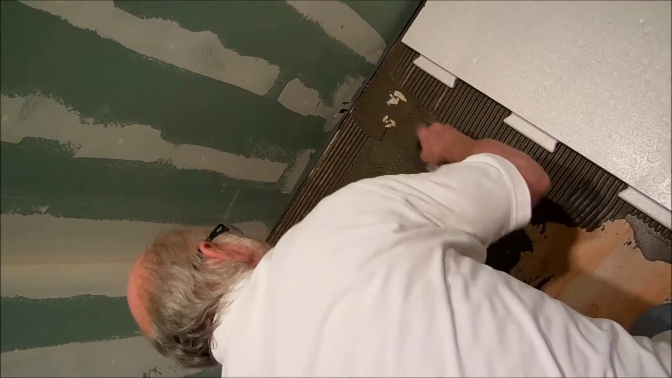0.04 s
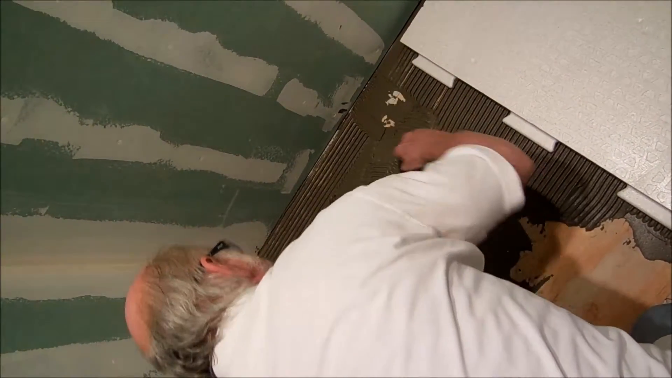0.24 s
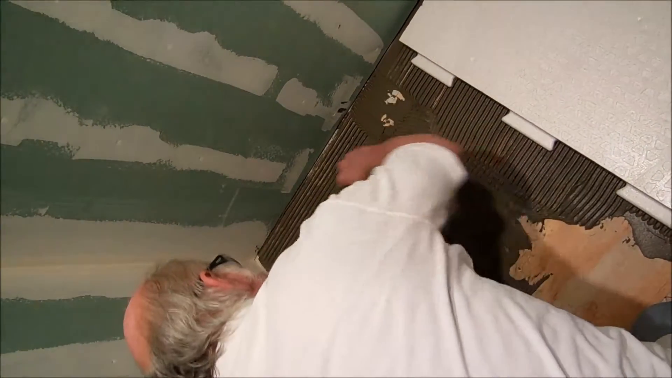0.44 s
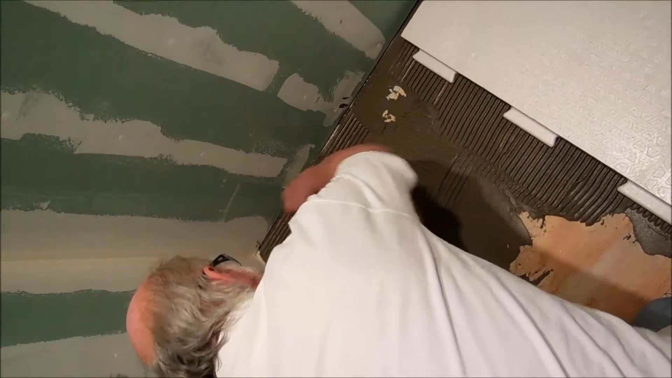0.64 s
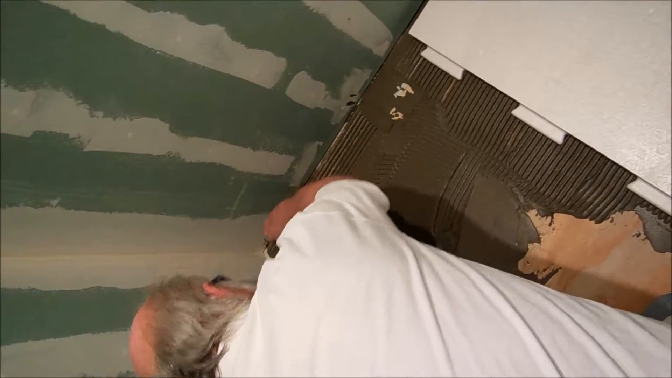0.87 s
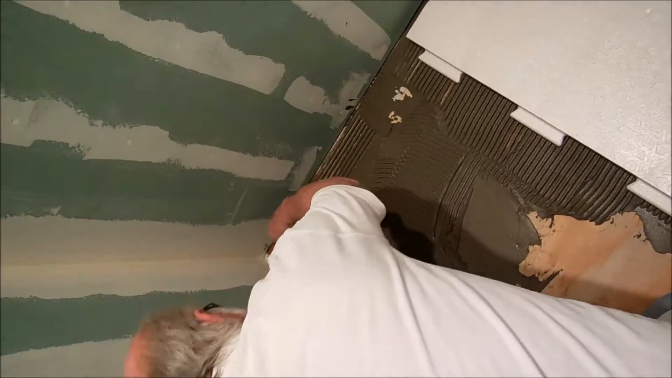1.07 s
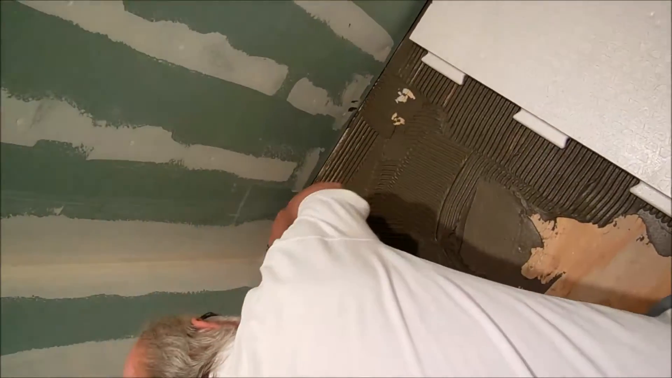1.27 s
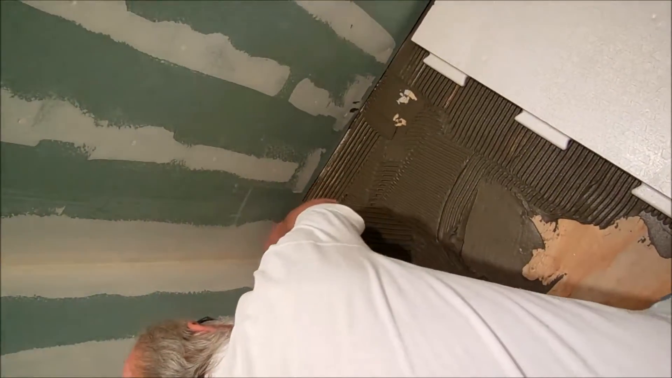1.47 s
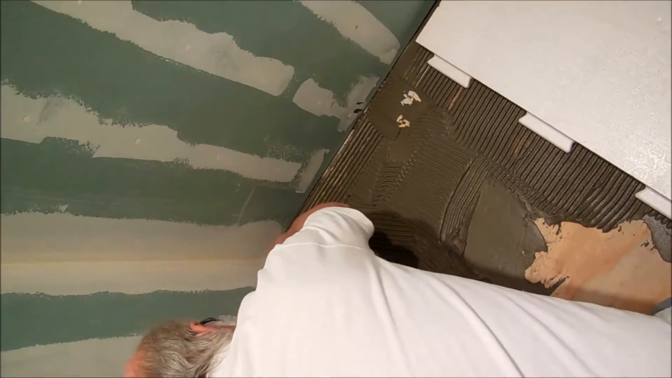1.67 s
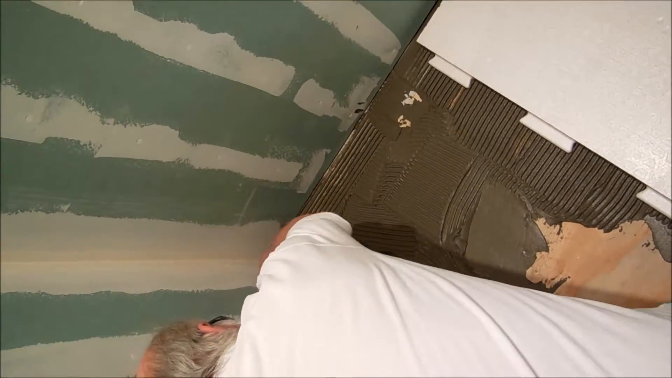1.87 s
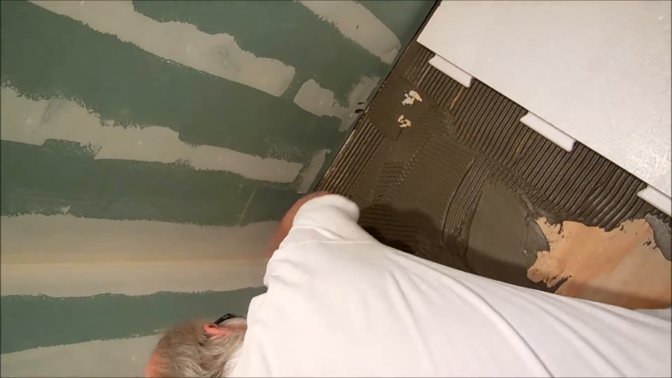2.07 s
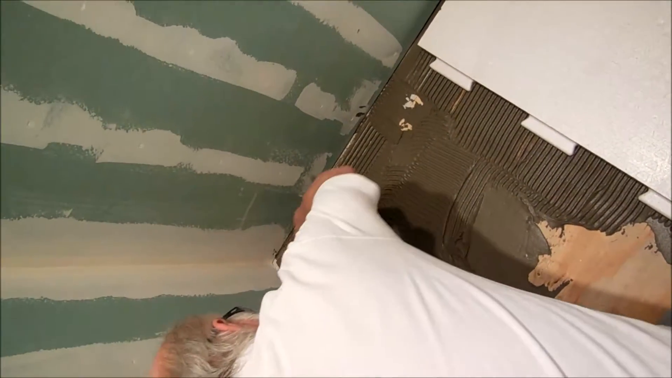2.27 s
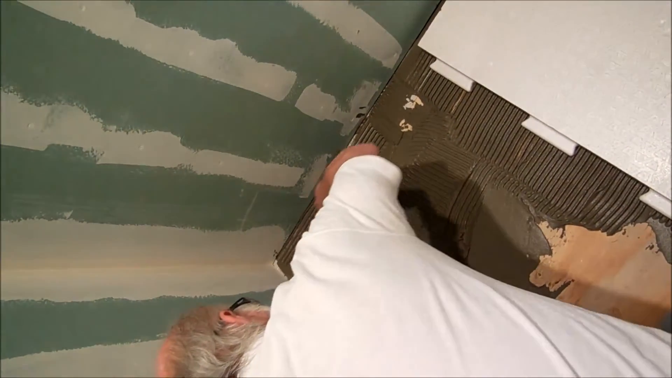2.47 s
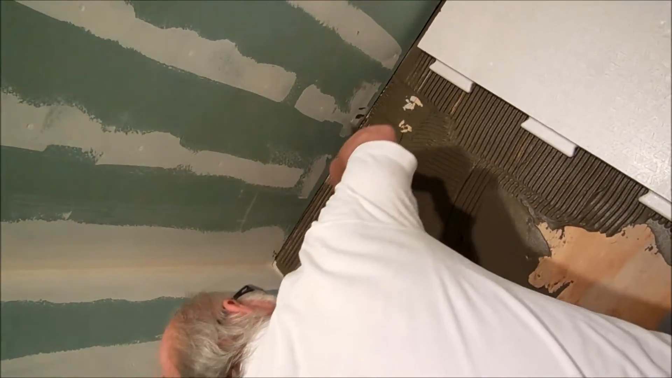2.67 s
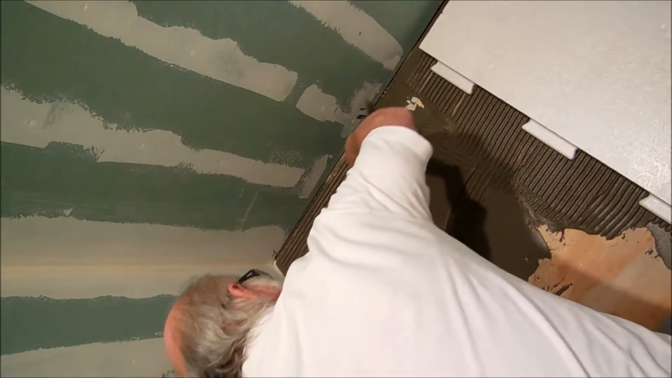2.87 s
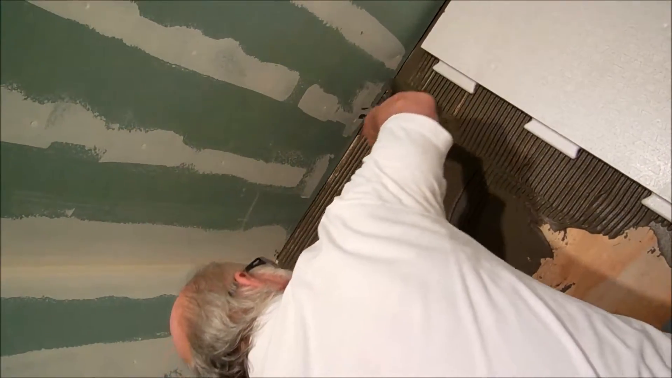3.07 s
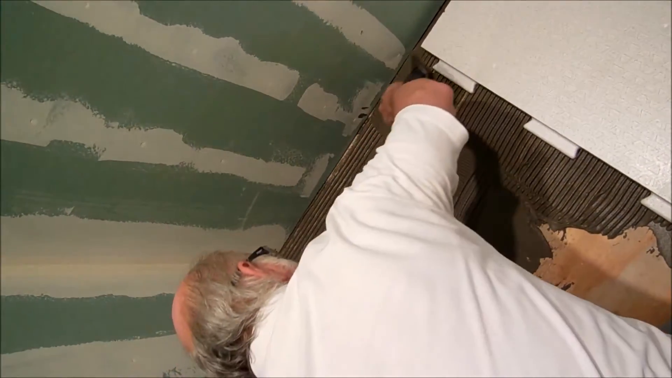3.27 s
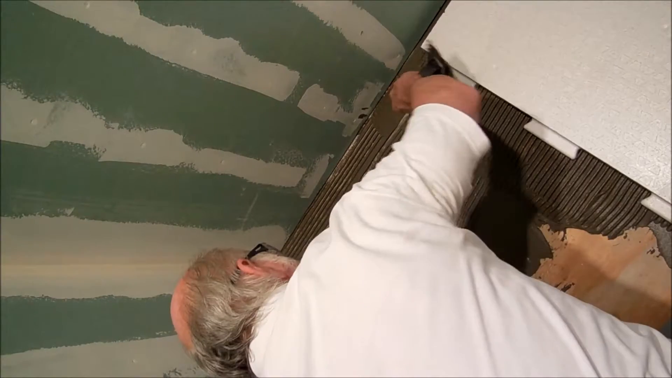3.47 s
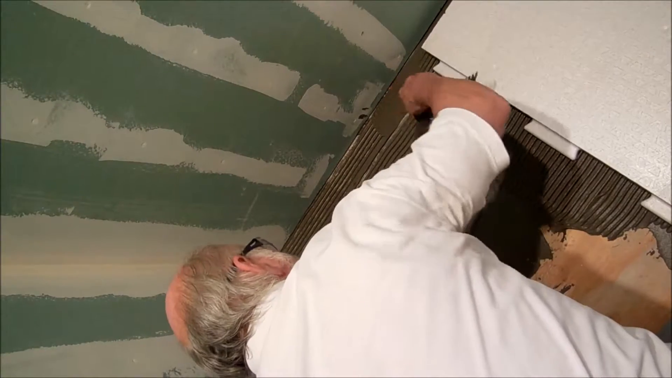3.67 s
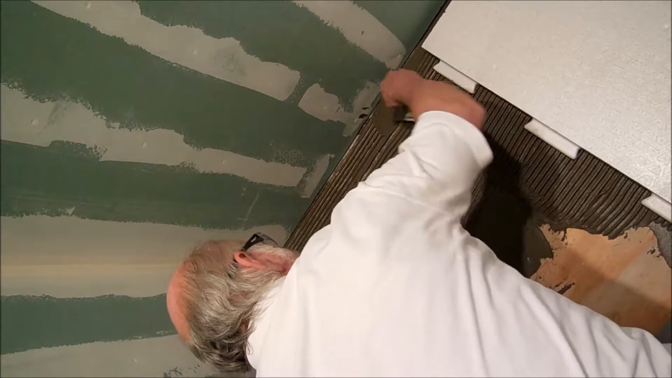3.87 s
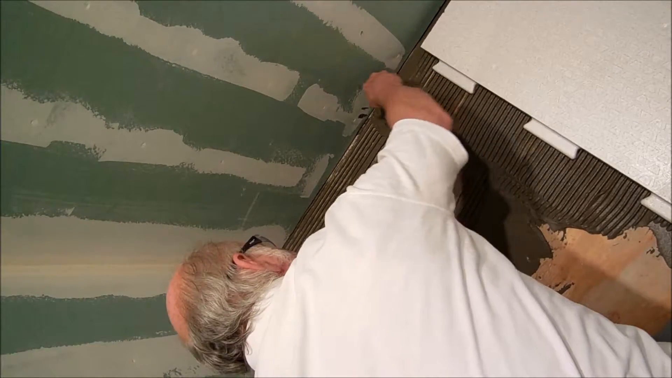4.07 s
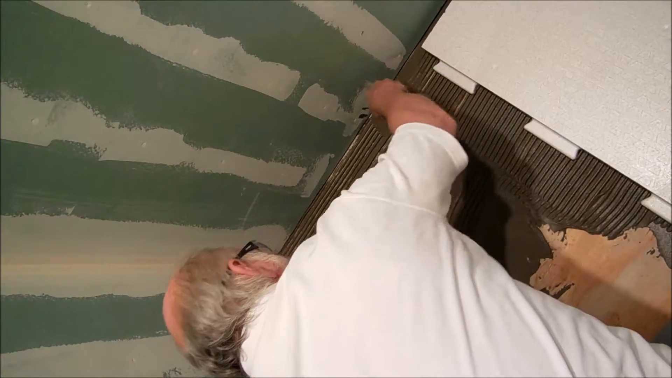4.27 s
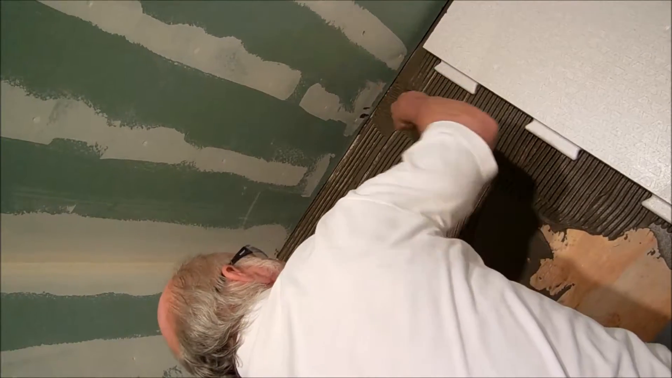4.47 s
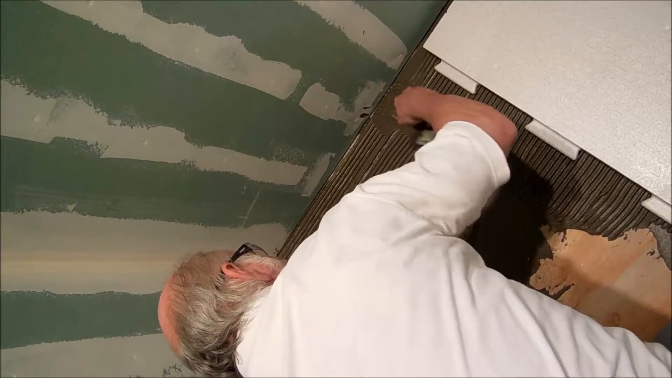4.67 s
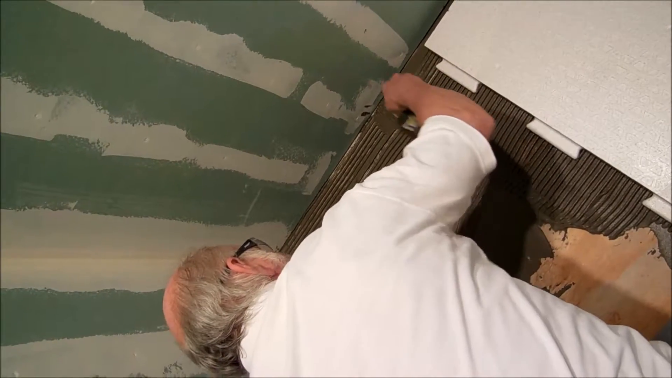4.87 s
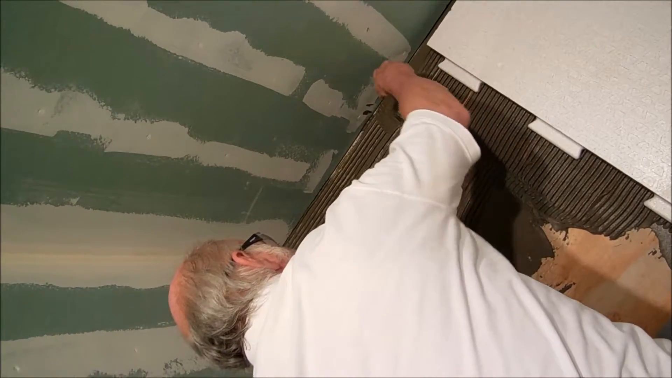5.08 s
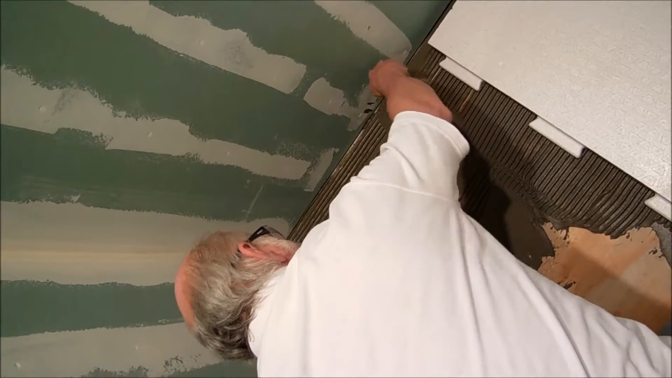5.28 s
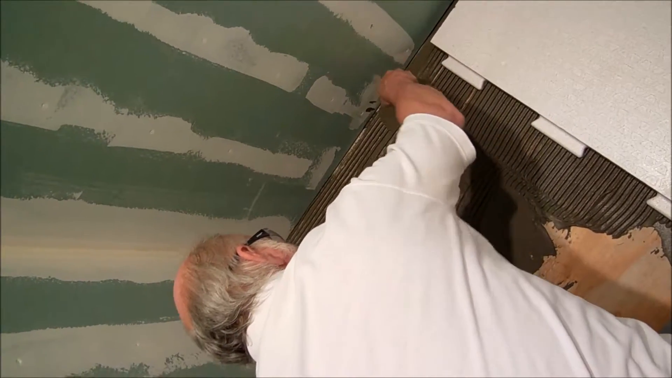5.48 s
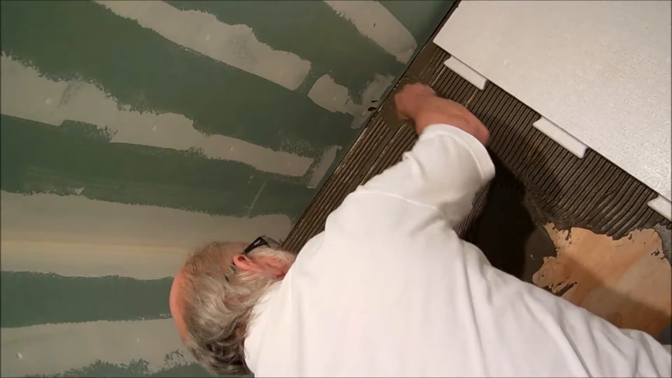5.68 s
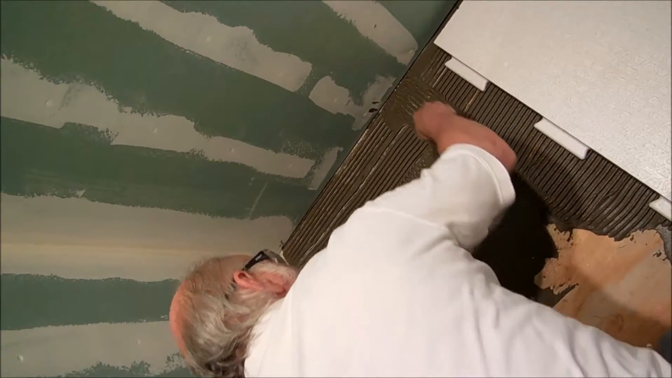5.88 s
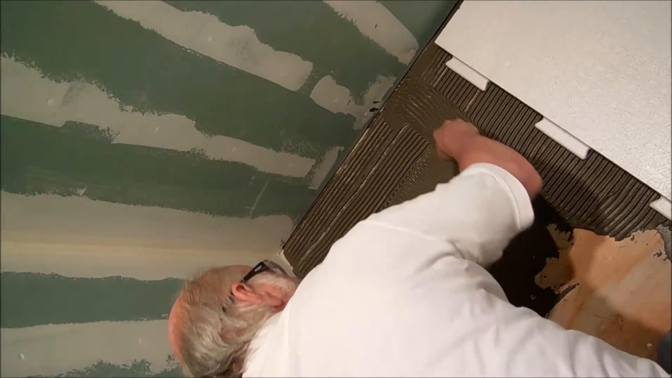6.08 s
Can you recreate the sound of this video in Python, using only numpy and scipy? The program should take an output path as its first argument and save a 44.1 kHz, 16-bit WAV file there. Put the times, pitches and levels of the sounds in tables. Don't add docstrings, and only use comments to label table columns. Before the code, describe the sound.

A small hard-walled stall with a short bright echo, steady microphone hiss and a faint low building rumble. At 0 seconds the loud end of a gritty trowel stroke stops within a tenth of a second, its echo fading. A tiny wet tick comes at 0.3, a soft dull tap at 1.0, a light bright brush near 1.4 and a tick at 1.5. The blade settles at 1.9, then from 2.05 to 3.6 it drags long and unevenly through sandy mortar, rasping, surging and chattering, with stones snapping under its teeth. From 3.7 to 4.15 a faint metallic hum and sticky mortar clicks. A short hard scrape runs from 4.3 to 4.6. More small clicks follow from 5.1 to 5.45, then a slower, rougher drag from 5.5 continues to about 6.1. The work sits slightly right.

```python
import sys
import numpy as np
from scipy import signal
from scipy.fft import rfft, irfft, next_fast_len
from scipy.io import wavfile
from scipy.ndimage import map_coordinates

SR = 44100
rng = np.random.default_rng(int(sys.argv[2]) if len(sys.argv) > 2 else 0)


def decibels_to_gain(level_db):
    exponent = np.asarray(level_db, float) / 20
    return 10 ** exponent


def file_out(sig):
    cols = np.atleast_2d(sig).T
    lim = np.clip(cols, -1, 1)
    pcm = np.round(lim * 32767).astype(np.int16)
    wavfile.write(sys.argv[1], SR, pcm)


N = 270333

# time in seconds, hand pressure in dB,
# load in dB (how much heaped paste joins the blade to the slab).
STROKES = [
    [(0.0, -26.5, -10.5), (.014, -25, -12.5), (.09, -55.5, -5), (.3, -69, -10)],
    [(2.05, -42, -12), (2.074, -28, -23.5), (2.105, -26, -11.5), (2.16, -32, -4.5), (2.21, -36.5, -5.5),
     (3.39, -39, -4.5), (3.482, -48, -5.5), (3.54, -38, -5), (3.59, -72, 14)],
    [(4.32, -59, -2), (4.328, -33.5, -20.5), (4.365, -31.5, -4.5), (4.388, -29, -9.5), (4.44, -25.5, -9.5),
     (4.5, -28, -3), (4.545, -40, -3), (4.62, -61, -16)],
    [(5.515, -51, -9), (5.529, -39.5, -8), (5.594, -28.5, -9), (5.655, -31, -1), (5.712, -28, -1),
     (5.775, -36.5, -9), (5.85, -35, -3), (5.896, -40, -12), (6.13, -38, -6)],
]
# middle in seconds, length in seconds,
# added pressure in dB, added load in dB.
SHOVES = [(2.252, 0.074, 2.5, 2), (2.31, 0.051, -1, 1.5), (2.386, 0.057, 3.5, 2), (2.445, 0.032, 3.5, 6.5),
          (2.528, 0.047, 3, 1), (2.564, 0.017, 4, 4), (2.663, 0.053, -1, 1.5), (2.693, 0.043, 4, -1),
          (2.76, .05, 3.5, 1.5), (2.82, 0.02, -2, -7), (2.875, 0.11, 2, -0.5), (3.025, 0.1, 8, -2.5),
          (3.11, 0.049, 3, 4), (3.19, 0.047, 4, 0.5), (3.273, .05, 0, -1), (3.365, .06, 0, 2.5),
          (5.819, 0.049, 1, 2), (5.963, 0.095, 3.5, 1.5), (6.054, 0.045, 3.5, -1)]
# peak in seconds, pressure in dB, load in dB.
SCUFFS = [
    (1.99, -41.5, -14),
    (2.045, -36, -18),
    (4.294, -56.5, -2),
    (5.483, -50.5, -7),
]
SCUFF_RISE, SCUFF_FALL = 3000, 110
# time in seconds, low bend in Hz, high bend in Hz.
FLEX = [(0.0, 660, 1720), (2.0, 706, 1630), (2.144, 660, 1530), (2.26, 440, 1500), (2.45, 600, 1290),
        (2.53, 720, 1160), (2.8, 606, 1170), (2.93, 540, 1420), (3.1, 845, 1400), (3.4, 570, 1210),
        (4.38, 485, 1430), (4.5, 770, 1400), (5.53, 467, 1350), (5.72, 550, 1230), (5.94, 414, 1530),
        (6.13, 620, 1320)]
# pitch in Hz, width in Hz, level in dB over the broad sound.
WET_MODES = [(150, 74, -4.5), (353, 11, 0.5), (535, 190, -20), (765, 32, 6), (870, 28, 1),
             (1170, 230, -4.5), (1335, 23, -33), (1630, 28, -21), (2040, 83, -6), (2282, 31, -0.5),
             (2770, 60, -14), (3617, 60, 3), (4050, 76, 1)]
# Hz, level in dB per Hz.
SLAB_COLOUR = [(71, -69), (120, -34), (140, -9.5), (174, -16), (241, -4), (527, -0.5), (675, -4.5),
               (1400, -7.5), (1820, -31), (3080, -120)]
# Hz, level in dB per Hz.
BLADE_COLOUR = [(470, -34), (800, -8), (987, -4), (1230, -3), (1860, -0.5), (4500, -8), (5850, -14),
                (9900, -120)]
# Hz, level in dB per Hz.
GRIT_COLOUR = [(1760, -7.5), (3000, -1), (3850, -2.5), (4180, -0.5), (5520, -1.5), (11200, 0.5),
               (14400, -1), (15200, -0.5), (15700, -33)]
BLADE_DB, BLADE_FEELS_LOAD = -2.5, 0.23
CLING_DB_PER_S = 3.5
# middle in seconds,
# length in seconds, pitch in Hz, width in Hz, level in dB.
CHATTER = [(0.017, 0.046, 1680, 199.4, -39), (0.419, .05, 1650, 160, -76), (.89, .08, 1540, 230, -74),
           (1.7, .06, 1496, 90, -74), (1.96, 0.1, 1600, 200, -57), (2.138, 0.038, 630, 109.6, -35.5),
           (1.94, .05, 2810, 150, -66), (4.3, 0.016, 2190, 252, -57), (5.496, 0.035, 3120, 150, -57),
           (5.491, 0.037, 1540, 201, -55.5), (2.16, 0.11, 1343, 70, -40), (2.26, 0.073, 360.6, 49.2, -45),
           (3.04, 0.064, 839, 48.5, -41), (3.115, 0.04, 858, 52, -31), (3.55, 0.022, 560, 220, -46),
           (4.41, 0.092, 346.3, 29.8, -42), (4.49, 0.055, 870, 91.8, -37), (4.42, 0.069, 527, 120.7, -33),
           (5.62, 0.07, 1201, 250.3, -39), (5.71, 0.024, 592, 59, -32), (5.71, 0.073, 1296, 200, -34.5),
           (6.0, 0.049, 623, 72, -40.5), (5.65, 0.19, 155, 41, -53.5), (6.06, 0.13, 150, 40.3, -55.5)]
# Hz, likeness from 0 to 1.
WORK_ALIKE = [(100, 0.88), (400, 0.87), (1000, 0.74), (2500, 0.34), (8000, 0.15), (15000, 0.5)]
# Hz, left minus right in dB.
TILT = [(100, 8), (300, 3), (1500, 0), (8000, -1), (10500, -2), (13000, 4.5)]
PAN_DB = -5.5
# Hz, time to fall 60 dB in seconds.
STALL_DECAY = [(150, 0.22), (1500, 0.35), (4000, 0.28), (12000, 0.23)]
# Hz, time to fall 60 dB in seconds.
HOUSE_DECAY = [(150, 0.4), (500, 0.65), (1100, .8), (2000, 0.7), (3000, 0.42), (12000, 0.33)]
# Hz, level in dB per Hz.
HISS_COLOUR = [(45, -30), (70, -12), (124, -14), (300, -14), (620, -19), (1000, -18.5), (1600, -21.5),
               (2700, -24), (5000, -25.5), (11500, -24), (14000, -25.5), (16000, -26.5)]
# Hz, level in dB per Hz.
RUMBLE_COLOUR = [(15, -36), (26, -10), (33, 0), (40, -12), (52, -8.5), (70, -21), (100, -53)]
# Hz, likeness from 0 to 1.
STILL_ALIKE = [(30, 0.62), (70, 0.58), (200, 0.6), (1000, 0.63), (10000, 0.3)]
HISS_DB, RUMBLE_DB = -65.5, -67.5
SHAKE_DB = -42.5
# start in seconds, peak in dB, pitch in Hz.
TICKS = [(0.284, -52, 4500), (1.5055, -52, 3900), (3.809, -52, 3980), (3.8336, -48, 3900),
         (3.8736, -54, 5300), (3.944, -51, 4040), (4.0114, -54, 3720), (4.146, -65, 3740),
         (5.1088, -56, 3990), (5.1362, -57, 3940), (5.1751, -55, 5280), (5.2454, -53, 3880),
         (5.3088, -55, 4050), (5.445, -55, 4070)]
# peak in seconds, rise in dB per second, fall in dB per second,
# dull level in dB, bright level in dB.
TOUCHES = [
    (1.008, 600, 140, -63, -66),
    (1.39, 450, 450, -67, -52),
]
# Hz, level in dB per Hz.
DULL_COLOUR = [(180, -36), (300, -17), (838, -7), (1190, -7.5), (1970, -2), (6000, -13), (7800, -50),
               (13200, -120)]
# Hz, level in dB per Hz.
BRIGHT_COLOUR = [(2350, -48), (4000, -29), (7930, -12.5), (8700, -10), (12300, -5), (16000, -13)]
# peak in seconds, rise in dB per second, fall in dB per second, level in dB.
LANDING = (1.918, 700, 70, -49)
# Hz, level in dB per Hz.
LANDING_COLOUR = [(35, -41), (60, -13), (251, -3), (324, -15), (503, -3), (577, -15), (855, -10),
                  (1100, -20), (1560, -10), (1960, -15), (2840, -20), (5430, -28), (10900, -9.5),
                  (14000, -20), (15000, -49)]
# start in seconds, peak in dB.
STONES = [(1.9879, -35.5), (2.0719, -15), (2.36, -27), (2.3824, -20), (2.4444, -18.5), (2.5647, -24),
          (2.6819, -11), (2.7548, -8), (2.9993, -28), (3.019, -13), (3.4394, -20), (3.5457, -17),
          (4.2941, -31), (4.3232, -26), (4.387, -12), (4.4454, -18), (4.4838, -18), (4.4954, -18.5),
          (5.4847, -37), (5.5297, -24), (5.5896, -29), (5.6535, -11), (5.7094, -25), (5.8394, -14)]
# start in seconds, peak in dB.
CONTACTS = [
    (1.99, -36),
    (4.291, -56),
    (5.484, -37),
]
# pitch in Hz, level in dB, time to fall 60 dB in seconds.
EDGE_TONES = [(560, -15, 0.041), (1065, -4, 0.055), (1600, -3, .06), (2390, -7, 0.033), (3070, -5, 0.077),
              (4120, -18, .04)]
# peak in seconds, rise in dB per second, fall in dB per second,
# pitch in Hz, level in dB.
HUM = [
    (3.7, 200, 257, 1600, -67),
    (3.85, 130, 49, 1630, -63.5),
]


def unit(x):
    return x / np.sqrt(np.mean(x ** 2) + 1e-20)


def along(points, hz):
    f, v = np.transpose(points)
    return np.interp(np.log(hz + 1), np.log(f + 1), v)


def held(table, column):
    table = np.array(table)
    return np.interp(np.arange(N) / SR, table[:, 0], table[:, column])


def fading(tables, column):
    t = np.arange(N) / SR
    levels = []
    for rows in tables:
        table = np.array(rows)
        level_db = np.interp(t, table[:, 0], table[:, column], -150)
        levels.append(level_db - 400 * np.maximum(t - table[-1, 0], 0))
    return np.max(levels, axis=0)


def wobble(rate, at=None):
    at = np.arange(N) if at is None else at
    knots = rng.standard_normal(int(N * rate / SR) + 4)
    return map_coordinates(knots, [at * rate / SR])


def swell(s, rise, fall):
    u = np.arange(N) / SR - s
    return np.where(u < 0, rise * u, -fall * u)


def filtered(x, response):
    m = next_fast_len(N + SR // 2)
    return irfft(rfft(x, m) * response(np.fft.rfftfreq(m, 1 / SR)), m)[..., :N]


def spread(pair, colour, alike):
    def response(hz):
        turn = np.arccos(np.clip(along(alike, hz), -1, 1)) / 2
        return decibels_to_gain(along(colour, hz)) * [np.cos(turn), np.sin(turn)]
    mid, side = filtered(pair, response)
    return unit(np.array([mid + side, mid - side]))


def jolts(per_second, scatter_db, life_s, smooth):
    size = np.minimum(rng.exponential(1, N), 3)
    hits = (rng.random(N) < per_second / SR) * decibels_to_gain(scatter_db * size)
    gate = signal.lfilter([1], [1, -np.exp(-1 / (life_s * SR))], hits)
    return rng.standard_normal((2, N)) * np.sqrt(smooth ** 2 + unit(gate) ** 2)


def bent(x, column, bend_db, width_hz, swing_db):
    hz, t, z = signal.stft(x, SR, nperseg=2048)
    at = np.minimum((t * SR).astype(int), N - 1)

    def bell(centre, width):
        return 1 / (1 + (2 * (hz[:, None] - centre) / width) ** 2)

    gain = 1 + decibels_to_gain(bend_db) * bell(held(FLEX, column)[at], width_hz)
    for centre, width, db in WET_MODES:
        gain = gain + decibels_to_gain(db + swing_db * wobble(11, at)) * bell(centre, width)
    return unit(signal.istft(z * gain, SR, nperseg=2048)[1][:, :N])


def hand():
    t = np.arange(N) / SR
    pressure_db, load_db = fading(STROKES, 1), held(np.vstack(STROKES), 2)
    for s, length, push_db, heap_db in SHOVES:
        bell = np.exp(-(2 * (t - s) / length) ** 2)
        pressure_db = pressure_db + push_db * bell
        load_db = load_db + heap_db * bell
    for s, db, heap_db in SCUFFS:
        scuff_db = db + swell(s, SCUFF_RISE, SCUFF_FALL)
        load_db = np.where(scuff_db > pressure_db, heap_db, load_db)
        pressure_db = np.maximum(scuff_db, pressure_db)
    starts = [rows[0][0] for rows in STROKES] + [row[0] - .03 for row in SCUFFS]
    since = [np.where(t >= start, t - start, N) for start in starts]
    return pressure_db, load_db, np.min(since, axis=0)


def strokes():
    pressure_db, load_db, since = hand()
    snag_db = wobble(50)
    slab = spread(jolts(1500, 1.5, 0.0011, 0.91), SLAB_COLOUR, WORK_ALIKE)
    slab = bent(slab, column=1, bend_db=2.0, width_hz=400, swing_db=0.5)
    blade = spread(jolts(1800, 2.4, 0.00076, 0.99), BLADE_COLOUR, WORK_ALIKE)
    blade = bent(blade, column=2, bend_db=-3, width_hz=450, swing_db=3.5)
    grit = spread(jolts(3000, 2.1, .0002, 1.0), GRIT_COLOUR, WORK_ALIKE)
    blade_db = pressure_db + BLADE_DB + BLADE_FEELS_LOAD * load_db - CLING_DB_PER_S * since
    sound = decibels_to_gain(pressure_db + load_db + snag_db + 1.2 * wobble(70)) * slab
    sound += decibels_to_gain(blade_db + snag_db + 0.56 * wobble(60)) * blade
    sound += decibels_to_gain(pressure_db + .9 * snag_db + .6 * wobble(80)) * grit
    return sound


def chatter():
    t, out = np.arange(N) / SR, np.zeros(N)
    for s, length, hz, width_hz, db in CHATTER:
        near = slice(max(round((s - .2) * SR), 0), round((s + .2) * SR))
        u = t[near] - s
        knots = rng.standard_normal((2, 200))
        a, b = (map_coordinates(k, [(u + .3) * width_hz]) for k in knots)
        tone = a * np.sin(2 * np.pi * hz * u) + b * np.cos(2 * np.pi * hz * u)
        out[near] += decibels_to_gain(db) * np.exp(-(2 * u / length) ** 2) * tone
    return out


def tail(decays):
    hz, t, z = signal.stft(rng.standard_normal((2, SR * 3 // 4)), SR, nperseg=256)
    turn = np.arccos(np.clip(along(WORK_ALIKE, hz), -1, 1))[:, None] / 2
    mid, side = z[0] * np.cos(turn), z[1] * np.sin(turn)
    decay = decibels_to_gain(-60 * t / along(decays, hz)[:, None])
    answer = signal.istft(np.array([mid + side, mid - side]) * decay, SR, nperseg=256)[1]
    return answer / np.linalg.norm(answer[0])


def stall(x):
    answer = decibels_to_gain(-7.5) * tail(STALL_DECAY) + decibels_to_gain(-16.0) * tail(HOUSE_DECAY)
    late = np.pad(x, ((0, 0), (200, 0)))
    return signal.fftconvolve(late, answer, axes=1)[:, :N]


def still():
    hiss = spread(rng.standard_normal((2, N)), HISS_COLOUR, STILL_ALIKE) * decibels_to_gain([[-1.5], [1.5]])
    rumble = spread(rng.standard_normal((2, N)), RUMBLE_COLOUR, STILL_ALIKE) * decibels_to_gain([[-.6], [.6]])
    rumble_level = decibels_to_gain(RUMBLE_DB + 0.69 * wobble(3.3)) + decibels_to_gain(hand()[0] + SHAKE_DB)
    return hiss * decibels_to_gain(HISS_DB + .4 * wobble(3)) + rumble_level * rumble


def without_bass(x):
    return filtered(x, lambda hz: hz ** 2 / (hz ** 2 + 600 ** 2))


def ticks():
    out, t = np.zeros((2, N + SR)), np.arange(SR // 20) / SR
    for s, db, hz in TICKS:
        decay = decibels_to_gain(-60 * t / .012)
        ring = np.sin(2 * np.pi * hz * t) + 1.4 * rng.standard_normal(len(t)) * decay
        onset = 1 - np.exp(-t / .0004)
        out[:, round(s * SR):][:, :len(t)] += decibels_to_gain(db - 4) * decay * onset * ring
    return without_bass(out[:, :N])


def touches():
    dull = spread(jolts(1100, 1, 0.0011, 1.0), DULL_COLOUR, WORK_ALIKE)
    bright = spread(jolts(2000, 3.8, .0003, .9), BRIGHT_COLOUR, WORK_ALIKE)
    out = np.zeros((2, N))
    for s, rise, fall, dull_db, bright_db in TOUCHES:
        out += decibels_to_gain(swell(s, rise, fall)) * (decibels_to_gain(dull_db) * dull + decibels_to_gain(bright_db) * bright)
    return out


def landing():
    s, rise, fall, db = LANDING
    grains = spread(jolts(1300, 4.4, 0.00058, 0.88), LANDING_COLOUR, WORK_ALIKE)
    return decibels_to_gain(db + swell(s, rise, fall)) * grains


def stones():
    out, t = np.zeros((2, N + SR)), np.arange(SR // 20) / SR
    for s, db in STONES:
        burst = decibels_to_gain(db - 9 - 60 * t / .009) * rng.standard_normal((2, len(t)))
        out[:, round(s * SR):][:, :len(t)] += burst
    return without_bass(out[:, :N])


def contacts():
    out, t = np.zeros(N + SR), np.arange(SR // 10) / SR
    for s, db in CONTACTS:
        for hz, level_db, t60 in EDGE_TONES:
            strength_db = db + level_db - 18.5 + rng.normal(0, 6.9)
            tone = np.sin(2 * np.pi * hz * rng.normal(1, 0.059) * t)
            out[round(s * SR):][:len(t)] += decibels_to_gain(strength_db - 60 * t / t60) * tone
    return out[:N]


def hum():
    t, rings = np.arange(N) / SR, np.zeros(N)
    flutter = 2 * np.pi * np.cumsum(28 * wobble(90)) / SR
    for s, rise, fall, hz, db in HUM:
        rings += decibels_to_gain(db + swell(s, rise, fall)) * np.sin(2 * np.pi * hz * t + flutter)
    return (1 + 0.31 * wobble(70)) * rings


def scene():
    work = strokes() + chatter() + ticks() + touches() + landing() + stones() + contacts() + hum()
    work = work + stall(work)

    def placed(hz):
        balance_db = (PAN_DB + along(TILT, hz)) / 2
        slab = 1 / np.sqrt(1 + (115 / (hz + 1)) ** 8)
        return decibels_to_gain([balance_db, -balance_db]) * slab

    return decibels_to_gain(0.19) * filtered(work, placed) + still()


def low_pass(x):
    return signal.sosfilt(signal.butter(12, 16750, fs=SR, output="sos"), x)


def record(dry):
    mix = filtered(dry, lambda hz: hz < 15950)
    return low_pass(mix)


dry = scene()
out = record(dry)
file_out(out)
```